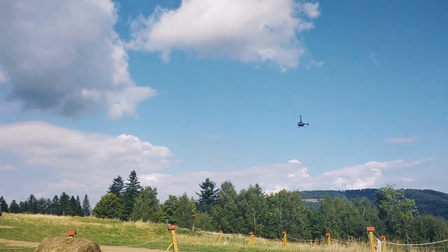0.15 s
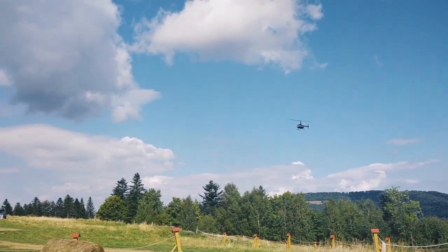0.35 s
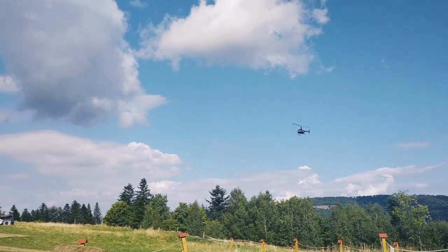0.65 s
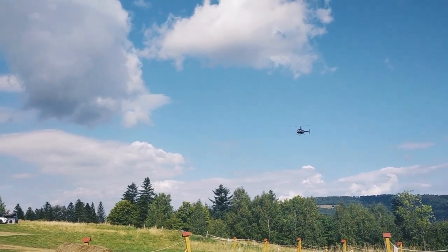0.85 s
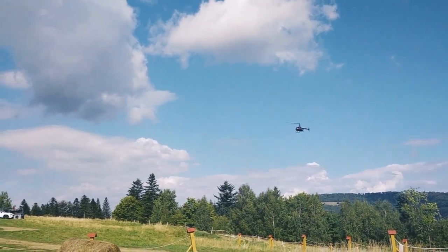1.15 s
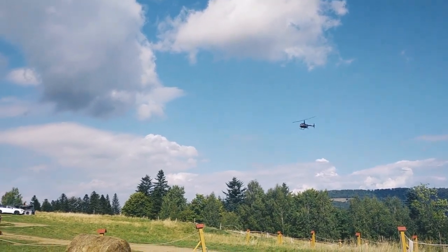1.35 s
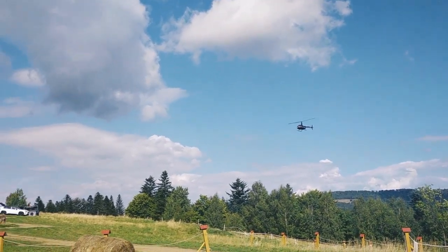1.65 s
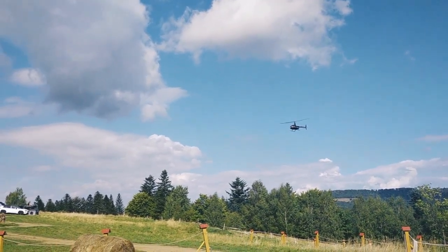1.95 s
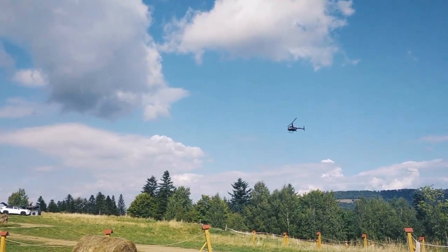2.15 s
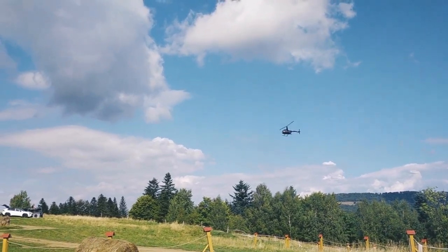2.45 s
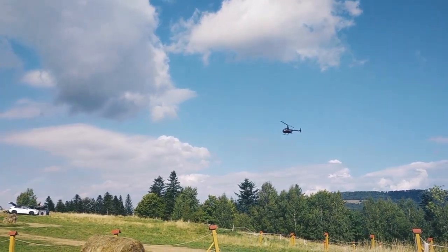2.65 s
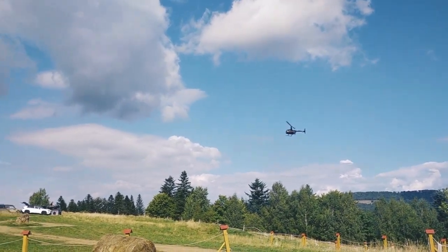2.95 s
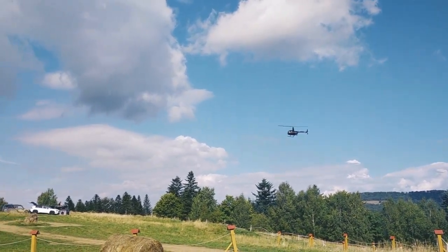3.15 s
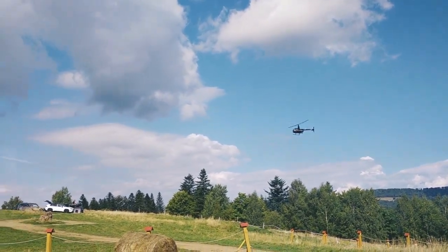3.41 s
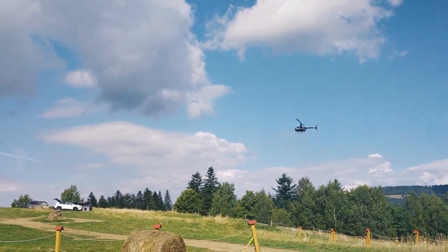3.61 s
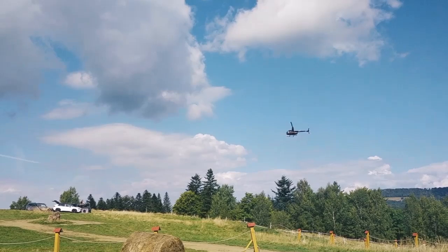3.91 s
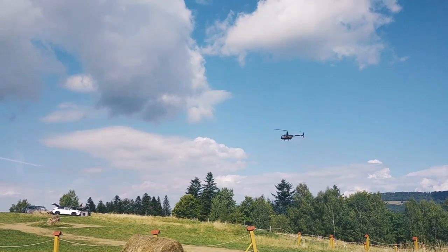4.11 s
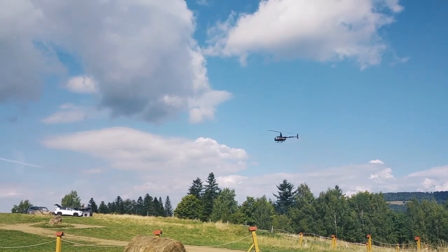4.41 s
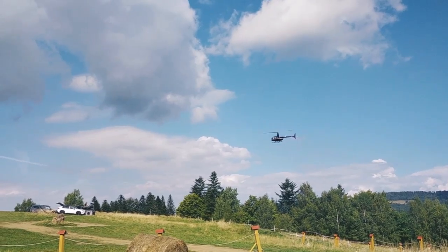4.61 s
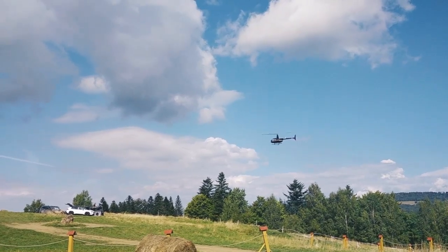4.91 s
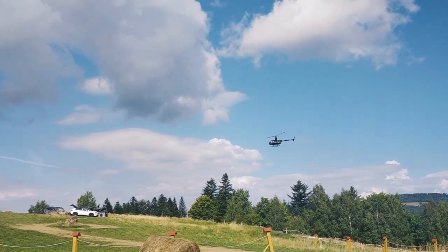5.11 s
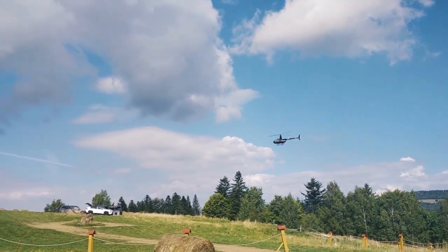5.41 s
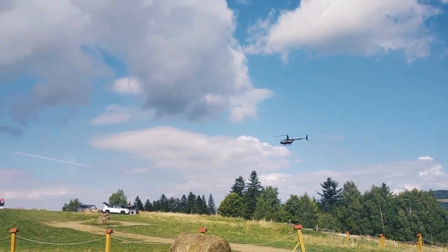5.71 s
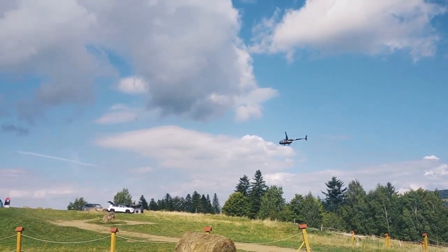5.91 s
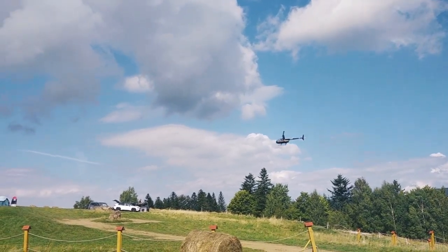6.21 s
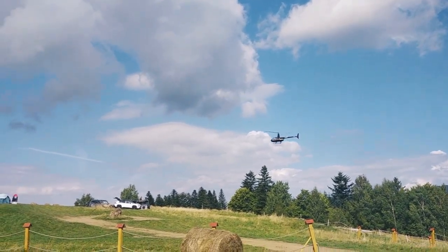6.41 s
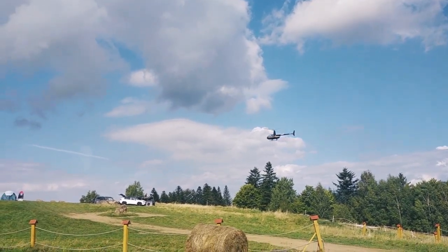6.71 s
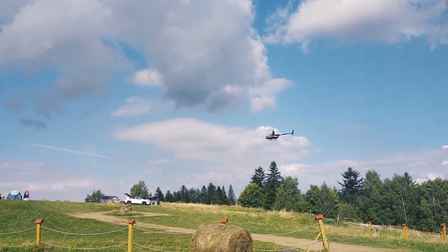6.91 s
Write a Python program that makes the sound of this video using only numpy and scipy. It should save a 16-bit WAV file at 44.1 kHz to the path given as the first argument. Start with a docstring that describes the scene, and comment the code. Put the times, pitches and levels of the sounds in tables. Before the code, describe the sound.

Fast helicopter blade chop peaks in hard cracks, then softens into a fluttering, surging rush and steady drone amid gusty low wind rumble.

```python
"""A light two-bladed piston helicopter flies past over a meadow, heard by one microphone in a gusty breeze.
From the start: exhaust and tail rotor drone (partials), surging rush and tip swish (shaped noise), wind rumble.
At once the blades also slap the vortex of the one before, a spike each, in bouts; the hardest, near 2.5 s, drive
a limiter that briefly ducks the rest. The ground echoes slap and rush; gliding resonances colour them from 0.56 s.
Eddies knock the microphone from 1.1 s on, most densely after 6.2 s, when the slaps are mostly faint."""
import sys
import numpy as np
from scipy import signal
from scipy.fft import rfft, irfft
from scipy.io import wavfile
from scipy.ndimage import uniform_filter1d, minimum_filter1d, map_coordinates

SR = 44100
rng = np.random.default_rng(int(sys.argv[2]) if len(sys.argv) > 2 else 0)


def transcribe(signal):
    """Save signal, clipped to [-1, 1], as a 16-bit WAV file at the path in sys.argv[1]."""
    frames = np.atleast_2d(signal).T
    limited = np.clip(frames, -1, 1)
    pcm = np.round(limited * 32767).astype(np.int16)
    wavfile.write(sys.argv[1], SR, pcm)


N = 311346
TIME = np.arange(N) / SR


def amp(db):
    """Decibels to gain."""
    return 10 ** (np.asarray(db) / 20)


def unit(x):
    """Scales to rms 1."""
    return x / np.sqrt(np.mean(x ** 2) + 1e-20)


def curve(rows, t=TIME, axis=1):
    """One column of a table, joined by straight lines in time."""
    rows = np.asarray(rows)
    return np.interp(t, rows[:, 0], rows[:, axis])


def spectrum_db(points, size):
    """A spectrum on the bins of an FFT, joined on a log-frequency axis."""
    hz, db = np.transpose(points)
    bins_hz = np.fft.rfftfreq(size, 1 / SR)
    return np.interp(np.log(bins_hz + 1), np.log(hz + 1), db)


def noise(points):
    """Noise of rms 1 with the given spectrum."""
    white = rfft(rng.standard_normal(N))
    return unit(irfft(white * amp(spectrum_db(points, N)), N))


def wander(rate_hz):
    """Slow chance of rms 1, moving up to about rate_hz times a second."""
    hz = np.fft.rfftfreq(N, 1 / SR)
    white = rfft(rng.standard_normal(N))
    return unit(irfft(white / (1 + (hz / rate_hz) ** 4), N))


def causal(points, size=2048):
    """Minimum-phase pulse: the sharpest one-sided pulse that has the given spectrum."""
    cepstrum = irfft(np.log(amp(spectrum_db(points, size))))
    # fold negative time onto positive
    cepstrum[1:size // 2] *= 2
    cepstrum[size // 2 + 1:] = 0
    return irfft(np.exp(rfft(cepstrum)))


def lowpass(order, edge_hz):
    """Butterworth low-pass sections."""
    return signal.butter(order, edge_hz, fs=SR, output="sos")


def throb(turns, centre, focus):
    """A gain of rms 1 that peaks once a turn."""
    return unit(np.exp(focus * np.cos(2 * np.pi * (turns - centre))))


def swell(peak_s, rise_s, fall_s):
    """A bell-shaped gain that reaches 1 at its peak."""
    width_s = np.where(TIME < peak_s, rise_s, fall_s)
    return np.exp(-((TIME - peak_s) / width_s) ** 2)


def swelling(steady_db, swells):
    """Gain of a steady sound with swells (peak, rise, fall, dB) on top; their powers add."""
    power = sum((amp(db) * swell(*shape)) ** 2 for *shape, db in swells)
    return np.sqrt(amp(steady_db) ** 2 + power)


BLADE_HZ = 13.8
# drift of the blades' arrival as the range changes: t/s, lag/s
ARRIVAL_LAG = [(0.0, 0.057), (0.56, 0.0535), (0.85, 0.0477), (1.5, 0.0399), (2.0, 0.0372), (2.6, 0.0374),
               (3.4, 0.0394), (4.0, 0.0426), (4.6, 0.0464), (5.3, 0.0537), (5.9, 0.0625), (7.06, 0.081)]


def blades_passed():
    """Count of main blades heard so far: steady rotation, seen through a changing travel time."""
    return BLADE_HZ * (TIME - curve(ARRIVAL_LAG))


def partials(turns, table, waver_db, smear):
    """Orders of a rotating part, wavering in the moving air; higher orders smear more."""
    out = np.zeros(N)
    for multiple, db in table:
        multiple = round(2 * multiple) / 2  # whole or half orders
        phase = multiple * turns + rng.random() + smear * np.sqrt(multiple) * wander(5.87)
        gain = amp(db + waver_db * wander(1.3))
        out += gain * np.sqrt(2) * np.cos(2 * np.pi * phase)
    return out


FIRINGS_PER_BLADE, TAIL_PER_BLADE = 10, 5.96
# exhaust drone level: t/s, level/dB
EXHAUST_LEVEL = [(0, -36.5), (0.5, -38.5), (1.6, -31), (3, -32.5), (3.9, -30.5), (4.6, -34.5), (5.3, -32.5),
                 (6.1, -32.5), (7.06, -31)]
# exhaust orders: multiple of the firing rate, level/dB
EXHAUST_ORDERS = [(.5, -14.5), (1, -3.5), (1.5, -19), (2, -22), (3, -29)]
# tail rotor level: t/s, level/dB
TAIL_ROTOR_LEVEL = [(0, -45.5), (1.5, -40), (3, -36), (4.5, -39.5), (5.7, -44.5), (6.4, -45), (7.06, -37.5)]
# tail rotor orders: multiple of the tail blade rate, level/dB
TAIL_ORDERS = [(1, -1), (2, 0), (3, -5.5), (4, -9), (5, -17), (8, -11), (10, -9)]


def drone(blades):
    """Exhaust and tail rotor are geared to the main rotor."""
    exhaust = partials(blades * FIRINGS_PER_BLADE, EXHAUST_ORDERS, waver_db=1.2, smear=.08)
    tail = partials(blades * TAIL_PER_BLADE, TAIL_ORDERS, waver_db=2, smear=.35)
    return amp(curve(EXHAUST_LEVEL)) * exhaust + amp(curve(TAIL_ROTOR_LEVEL)) * tail


# delay of the ground echo: t/s, delay/ms
GROUND_DELAY = [(0, 1.42), (.9, 1.44), (1.5, 1.56), (2, 1.39), (3, 1.34), (3.3, 1.2), (3.9, 1.35),
                (4.6, 1.57), (5.05, 2), (5.9, 1.405), (7.06, 1.14)]


def grounded(x, share):
    """Adds the ground echo, dulled by grass; its moving delay sweeps a comb through the sound."""
    read_at = np.arange(N) - curve(GROUND_DELAY) * SR / 1000
    echo = map_coordinates(uniform_filter1d(x, size=15), [read_at], order=3)
    return (x + share * echo) / np.sqrt(1 + share ** 2)


# turbulent air between surges: body below SPLIT_HZ, rasp above it, and hiss
BODY_DB, RASP_DB, HISS_DB, SPLIT_HZ = -39, -41, -56, 1100
# share of the rush that the ground throws back; it grows as the helicopter sinks towards the horizon
ECHO_SHARE, ECHO_GROWTH_PER_S = 0.065, 0.035
# surges of the turbulence: peak t/s, rise/s, fall/s, body level/dB, rasp level/dB, hiss level/dB
RUSH_SURGES = [(0.2, 0.097, 0.11, -43, -43, -68), (0.86, 0.33, 0.37, -55, -37, -56),
               (1.85, 0.14, 0.3, -47, -43.5, -57), (2.85, 0.25, 0.63, -34.5, -33, -49),
               (3.24, 0.085, 0.38, -36, -27.5, -45), (3.85, 1, 0.96, -35, -39, -53.5),
               (4.35, 0.11, 0.3, -39, -35.5, -49), (4.55, 0.21, 0.6, -36, -40.5, -55.5),
               (5.87, 0.26, 0.59, -50, -42, -54), (6.48, 0.17, 0.21, -34, -36.5, -56),
               (6.95, 0.28, 0.33, -48, -40.5, -53.5)]
# spectrum of body and rasp: f/Hz, relative density/dB
RUSH_SPECTRUM = [(40, -36), (120, -9.5), (220, 2.5), (365, -9), (490, 0), (950, -2.5), (1500, 0.5),
                 (2100, -2), (2650, -8), (3200, -25), (5000, -48)]
# spectrum of the hiss: f/Hz, relative density/dB
HISS_SPECTRUM = [(1500, -32), (2800, 8), (3300, -0.5), (4100, 2), (5200, -1), (6600, -11), (8100, -4),
                 (9500, -16.5), (12500, -20), (16000, -29)]


def rush(blades, flutter_db=1.26):
    """Turbulence off both rotors surges, swells with each blade and flutters with the air on its way."""
    peak, rise, fall, body_db, rasp_db, hiss_db = np.transpose(RUSH_SURGES)
    tail_buzz = throb(blades * TAIL_PER_BLADE, centre=.2, focus=.28)
    roar = noise(RUSH_SPECTRUM) * throb(blades, centre=0.17, focus=0.17)
    body = signal.sosfiltfilt(lowpass(3, SPLIT_HZ), roar)
    rasp = roar - body
    body = body * swelling(BODY_DB, zip(peak, rise, fall, body_db))
    rasp = rasp * swelling(RASP_DB, zip(peak, rise, fall, rasp_db))
    roar = (body + rasp) * amp(flutter_db * wander(33))
    hiss = noise(HISS_SPECTRUM) * throb(blades, centre=0.19, focus=0.15)
    hiss *= swelling(HISS_DB, zip(peak, rise, fall, hiss_db))
    return tail_buzz * (grounded(roar, share=ECHO_SHARE + ECHO_GROWTH_PER_S * TIME) + hiss)


# level of the tip swish: t/s, level/dB
SWISH_LEVEL = [(0, -62), (1.5, -62), (3.1, -57.5), (3.8, -55), (5.3, -64), (5.9, -56.5), (6.3, -69),
               (7.06, -63.5)]
# spectrum of the tip swish: f/Hz, relative density/dB
SWISH_SPECTRUM = [(2500, -17), (4500, 0.5), (6500, -6), (7500, 1.5), (8200, 6), (9400, -18.5), (11000, -18),
                  (12700, -8.5), (15000, -27)]


def swish(blades):
    """The advancing tip sizzles just after each slap."""
    flicker_db = 2 * wander(12)
    sizzle = noise(SWISH_SPECTRUM) * throb(blades, centre=0.17, focus=2.7)
    return sizzle * amp(curve(SWISH_LEVEL) + flicker_db)


BREEZE_DB = -42  # wind between gusts
# each eddy drags a short rumble along: level against the eddy, rise, fall
DRAG_DB, DRAG_RISE_S, DRAG_FALL_S = -2.5, 0.026, 0.02
# gusts: peak t/s, rise/s, fall/s, level/dB
WIND_GUSTS = [(0.87, 0.07, 0.12, -26.5), (1.12, 0.19, 0.24, -22.5), (1.45, 0.08, 0.076, -24),
              (1.65, 0.36, 0.27, -32.5), (2.03, 0.12, 0.15, -26), (3.42, 0.24, 0.15, -29),
              (3.98, 0.086, 0.13, -31), (4.17, 0.018, 0.044, -28.5), (4.57, 0.38, 0.27, -29.5),
              (4.89, 0.09, 0.1, -24.5), (5.25, 0.27, 0.28, -27), (5.62, 0.14, 0.45, -33),
              (6.68, 0.34, 0.1, -23)]
# spectrum of the rumble: f/Hz, relative density/dB
WIND_SPECTRUM = [(5, -14.5), (25, 2.5), (60, -1.5), (120, -8), (200, -18.5), (320, -19.5), (600, -53),
                 (2000, -82)]


def wind(lumpy_db=1.74, flutter_db=-33, strong_db=-28.0, steepen=1.72):
    """Lumpy rumble on the microphone follows gusts and eddies; strong ones add a higher flutter."""
    drags = [(s, DRAG_RISE_S, DRAG_FALL_S, db + DRAG_DB) for s, db, _, _ in EDDIES]
    force = swelling(BREEZE_DB, list(WIND_GUSTS) + drags)
    rumble = noise(WIND_SPECTRUM) * force
    flutter = noise([(40, -5), (110, 5.5), (200, 1.0), (330, -23.5), (1200, -22), (4000, -73)])
    flutter *= amp(flutter_db) * (force / amp(strong_db)) ** steepen
    return (rumble + flutter) * unit(amp(lumpy_db * wander(30)))


# spectrum of the noise floor: f/Hz, relative density/dB
FLOOR_SPECTRUM = [(30, 4), (1000, -3.5), (3500, -10), (6500, 4.5), (8200, 16.5), (10000, 2), (14000, 7.5),
                  (15700, 10.5)]


def noise_floor(level_db=-62):
    """Steady faint noise under everything."""
    return amp(level_db) * noise(FLOOR_SPECTRUM)


# slap bouts as the rotor sinks into its own wake: t/s, level/dB before accents
SLAP_BOUTS = [(0.057, -23), (0.129, -19), (0.417, -17), (0.703, -21), (1.0, -30), (1.5, -34.5),
              (1.778, -25), (2.356, -20.5), (2.501, -10), (2.719, -11.5), (3.15, -19), (3.6, -22.5),
              (4.3, -31), (4.83, -37.5), (5.198, -26.5), (5.28, -47), (5.8, -32), (6.7, -59)]
# single slaps louder or softer than their neighbours: t/s, extra level/dB
BLADE_ACCENTS = [(0.417, 4), (0.489, -6), (0.633, 2), (0.774, -6.5), (0.845, -4.5), (0.917, 6.5), (1.06, 5),
                 (1.346, 4.5), (1.706, 6), (2.646, -6.5), (2.792, -2), (3.082, 3.5), (3.519, 1),
                 (3.957, 2.5), (4.612, 9.5), (4.978, 5), (5.418, 11.5), (5.786, 1.5), (6.447, 14),
                 (6.962, 33)]


def slap_db(s):
    """Strength of the blade that arrives at s: its bout plus its own accent."""
    accent_db = sum(extra for at, extra in BLADE_ACCENTS if abs(at - s) < .5 / BLADE_HZ)
    return curve(SLAP_BOUTS, s) + accent_db


# a blade hits squarely at SQUARE_DB and glances fully within GLANCE_DB below it
SQUARE_DB, GLANCE_DB, LEAST_GLANCE = -12, 14, 0.22
# under PUFF_DB its slap crumbles into a puff
PUFF_DB, PUFF_PER_DB = -27, 0.4


def vortex_hits(level_db, glancing, t, ragged=1.0, spread_s=0.00304, scatter=0.073, scatter_s=0.0092,
                ring=0.036, ring_s=0.0021):
    """Impulses of one blade: main hit, four older vortices of alternate sign, scattered tail and ripple."""
    crumble = PUFF_PER_DB * max(PUFF_DB - level_db, 0)
    # trees and grass scatter a short tail behind the spike
    tail_gain = scatter * (0.037 + glancing + crumble)
    hits = tail_gain * rng.standard_normal(len(t)) * np.exp(-t / scatter_s)
    hits[0] += 1
    for (place, strength), sign in zip(rng.random(size=(4, 2)), (1, -1, 1, -1)):
        hits[int((.15 + place) * spread_s * SR)] += sign * ragged * glancing * strength
    # evenly spaced vortices leave a short ripple, at another pitch for each blade
    ripple_hz = 650 * 3 ** rng.random()
    ripple = np.cos(2 * np.pi * ripple_hz * t) * np.exp(-t / ring_s)
    return hits + ring * (0.89 + glancing) * ripple


# spectrum of the slap spike: f/Hz, relative density/dB
SLAP_SPECTRUM = [(20, 1.5), (90, -16), (180, 0), (270, 1), (400, -1.5), (650, -1), (1500, -3.5), (2000, -5),
                 (2600, -7), (3200, -22.5), (4500, -22), (6500, -30.5), (8200, -29.5), (11000, -46)]
# low thump under each slap: t/s, level/dB against the spike
THUMP_LEVEL = [(0.057, 8.5), (0.3, -12), (0.56, 9.5), (0.8, 5), (1.7, 9), (2.3, 14.5), (2.5, 1), (2.8, 8),
               (3.3, 9.5), (4, 10), (5, -4)]
# early hit on a nearer vortex: t/s, share of the main hit
EARLY_HIT = [(0, 1), (0.56, 0.18), (1.5, 0.7), (2.4, 0.058), (7.06, 0.35)]


def slaps(blades, lead_s=0.003125, dull_hz=3500, fickle=0.52, thump_hz=245, thump_s=0.0031):
    """One pressure spike a blade; a weak, glancing blade cuts several older vortices, a square hit only one."""
    times = np.interp(np.arange(int(blades[-1]) + 1), blades, TIME)
    pulse, t = causal(SLAP_SPECTRUM), TIME[:2048]
    lead = int(lead_s * SR)  # early hit to main hit
    thump = np.sin(2 * np.pi * thump_hz * t + np.pi / 3)
    thump *= np.exp(-t / thump_s) * (1 - np.exp(-t / 0.00032))
    out = np.zeros(N + len(t))
    for s in times:
        level_db = slap_db(s)
        glancing = np.clip(LEAST_GLANCE + max(SQUARE_DB - level_db, 0) / GLANCE_DB, 0, 1)
        hits = np.r_[curve(EARLY_HIT, s), np.zeros(lead), vortex_hits(level_db, glancing, t)]
        # the wider a blade misses the vortex core, the rounder its spike; no two pass alike
        edge_hz = dull_hz * np.exp(fickle * rng.standard_normal()) / (glancing + 0.47)
        rounded = signal.sosfilt(lowpass(2, min(edge_hz, SR / 3)), pulse)
        slap = signal.fftconvolve(hits, rounded)[:len(t)]
        slap /= np.sqrt(np.mean(slap[:400 + lead // 2] ** 2))  # rms 1 over its onset
        # the blade's bulk pushes a low thump along with it
        slap[lead:] += amp(curve(THUMP_LEVEL, s)) * thump[:len(t) - lead]
        start = max(round(s * SR) - lead, 0)
        out[start:][:len(t)] += amp(level_db) * slap
    return grounded(out[:N], share=0.33)


# reflections off the slope, each reinforcing one band:
# start t/s, end t/s, start f/Hz, end f/Hz, bandwidth/Hz, gain
SLOPE_GLINTS = [(0.71, 1.107, 2550, 2600, 300, 0.94), (0.56, 1.106, 740, 835, 300, 1.04),
                (1.193, 1.913, 600, 520, 120, 1.34), (1.75, 2.903, 1530, 1620, 300, 0.77),
                (2.7, 4.013, 933, 960, 109, 1.4), (3.41, 4.9, 734, 465, 114, 0.98),
                (3.697, 5.06, 1100, 1195, 150, 1.63), (4.802, 5.457, 2120, 2250, 199, 1.6),
                (5.454, 6.1, 2340, 2460, 200, 0.86), (5.496, 7.2, 915, 880, 151, 2.14)]


def glints(x):
    """Each reflection adds a gliding resonance that swells and fades."""
    out = x.copy()
    for start_s, end_s, start_hz, end_hz, width_hz, gain in SLOPE_GLINTS:
        progress = np.clip((TIME - start_s) / (end_s - start_s), 0, 1)
        centre_hz = start_hz + (end_hz - start_hz) * progress
        # shift the band to 0 Hz, smooth, shift back
        turn = np.exp(2j * np.pi * np.cumsum(centre_hz) / SR)
        pole = np.exp(-np.pi * width_hz / SR)
        band = 2 * (turn * signal.lfilter([1 - pole], [1, -pole], x / turn)).real
        out += gain * np.sin(np.pi * progress) * band
    return out


# eddies that hit the microphone: t/s, level/dB, length/s, upper edge f/Hz
EDDIES = [(1.137, -31, 0.14, 352), (1.188, -22.5, 0.06, 314), (1.241, -33, 0.072, 296),
          (1.463, -44, 0.027, 138), (2.895, -18, 0.035, 95), (4.905, -28, 0.024, 200),
          (5.349, -23.5, 0.025, 194), (6.236, -18, 0.014, 303), (6.339, -23, 0.065, 305),
          (6.606, -23, 0.08, 520), (6.677, -23.5, 0.068, 466), (6.77, -18.5, 0.033, 374),
          (6.867, -17.5, 0.021, 307), (7.003, -19.5, 0.019, 275)]


def buffets(low_hz=60, knock=0.5):
    """Each eddy is a firm low knock inside a short puff."""
    out = np.zeros(N)
    for s, db, length_s, edge_hz in EDDIES:
        window = np.exp(-2 * ((TIME - s) / (length_s / 2)) ** 2)
        push = window * rng.standard_normal(N)
        push[min(round(s * SR), N - 1)] += knock * np.sqrt(SR * length_s)
        band = signal.butter(3, [low_hz, edge_hz], "bandpass", fs=SR, output="sos")
        puff = signal.sosfilt(band, push)
        out += amp(db) * puff / np.sqrt(np.sum(puff ** 2) / np.sum(window))
    return out


def scene():
    """The count of blades that have passed drives every part of the helicopter."""
    blades = blades_passed()
    helicopter = glints(slaps(blades) + rush(blades)) + swish(blades) + drone(blades)
    return (helicopter + wind() + buffets() + noise_floor())[None]


def record(dry, ceiling=0.51, hold_s=.08, edge_hz=15950):
    """A look-ahead limiter holds its gain down for about hold_s after each peak; then the band limit."""
    hold, ramp = int(hold_s * SR) | 1, 129  # samples
    allowed = np.minimum(1, ceiling / (abs(dry[0]) + 1e-9))
    held = minimum_filter1d(allowed, hold, origin=hold // 2 - ramp)
    limited = dry * uniform_filter1d(held, ramp)
    band_limit = signal.firwin(511, edge_hz, window=("kaiser", 9), fs=SR)
    return signal.oaconvolve(limited, band_limit[None], "same")


dry = scene()
out = record(dry)
transcribe(out)
```